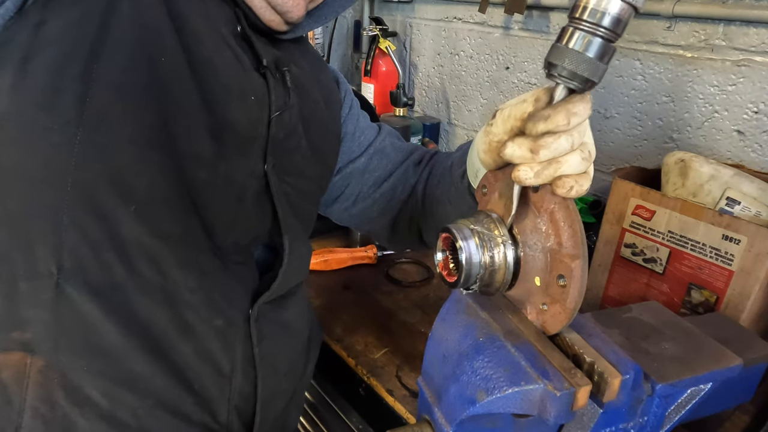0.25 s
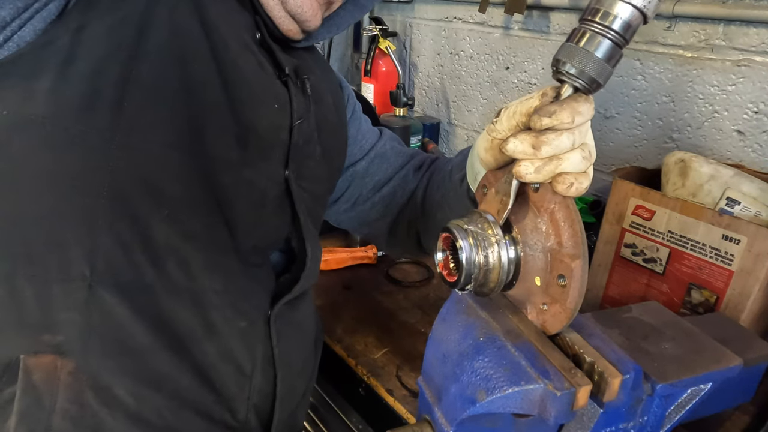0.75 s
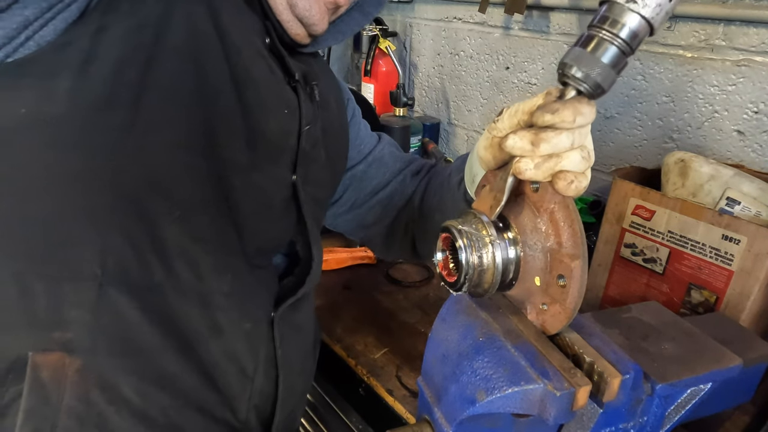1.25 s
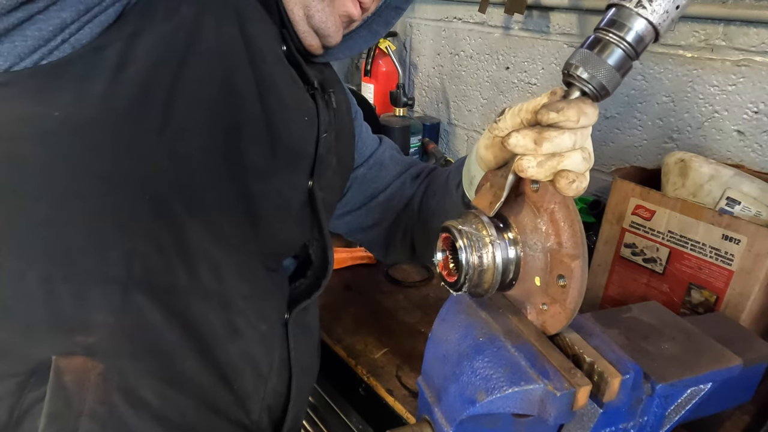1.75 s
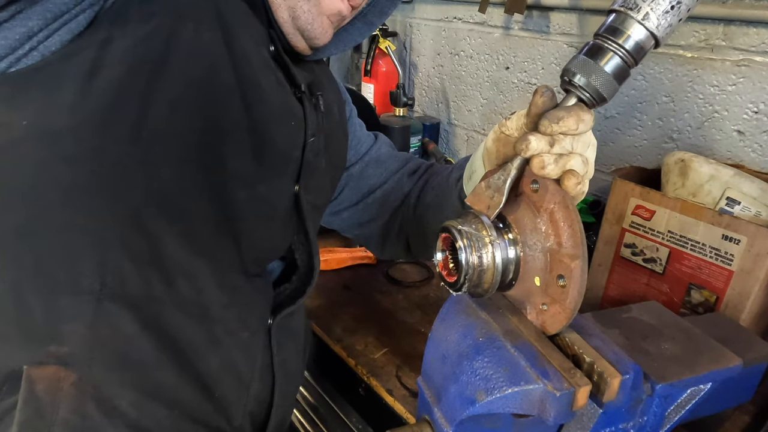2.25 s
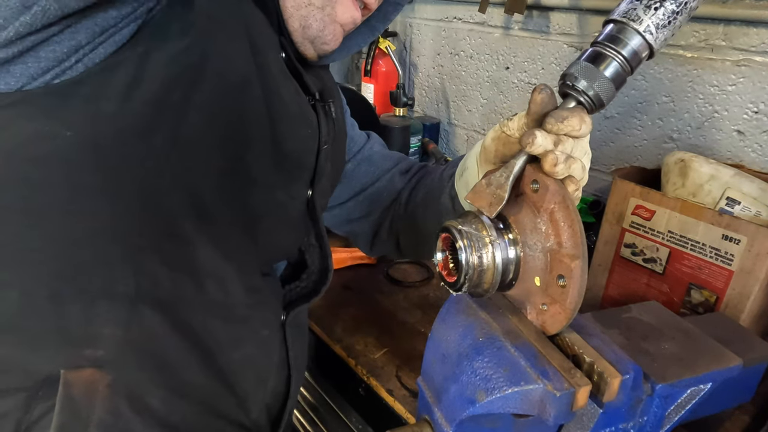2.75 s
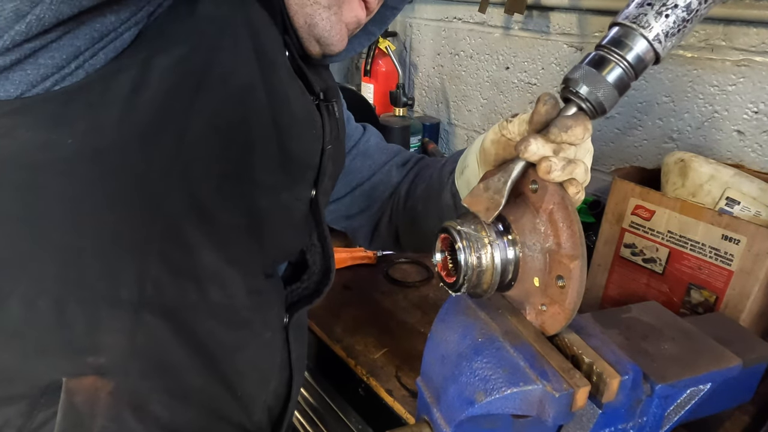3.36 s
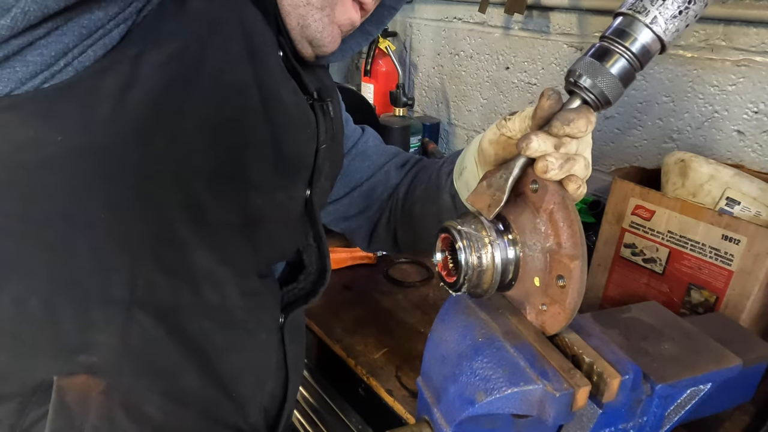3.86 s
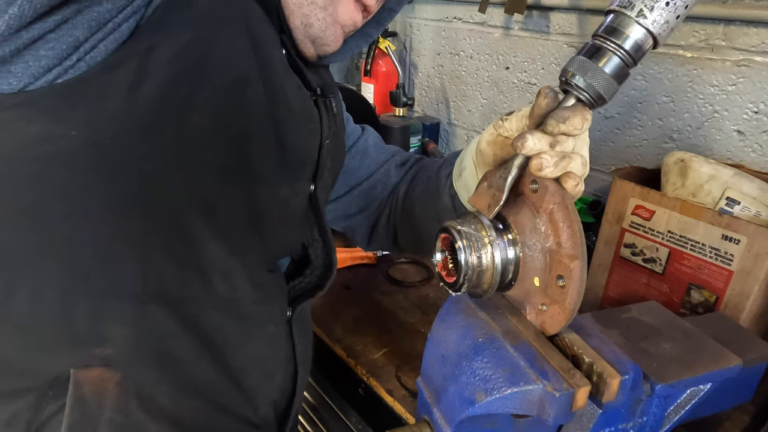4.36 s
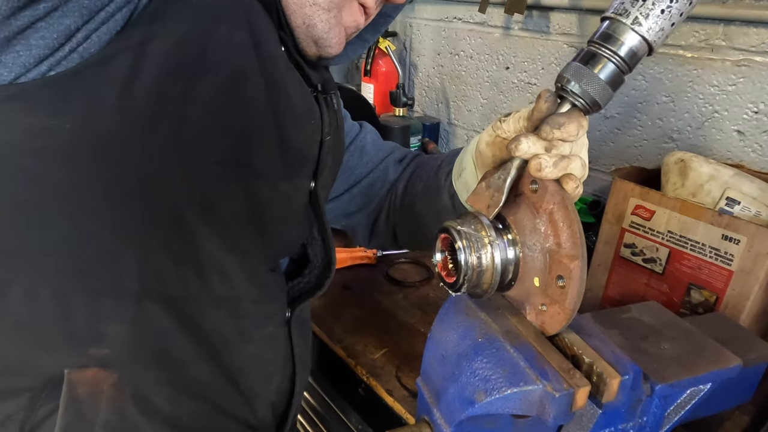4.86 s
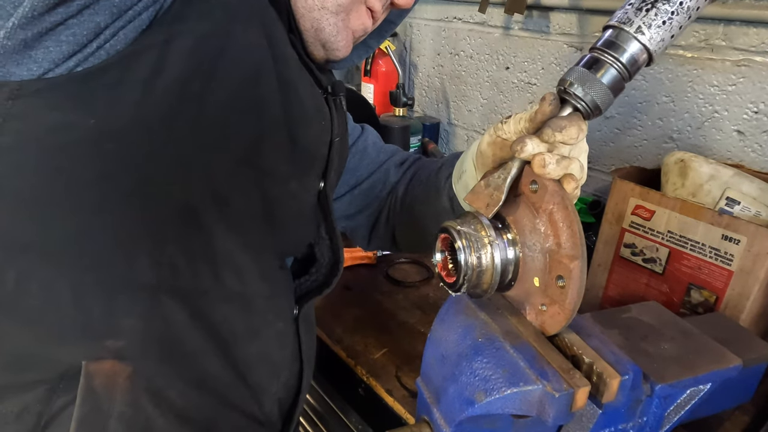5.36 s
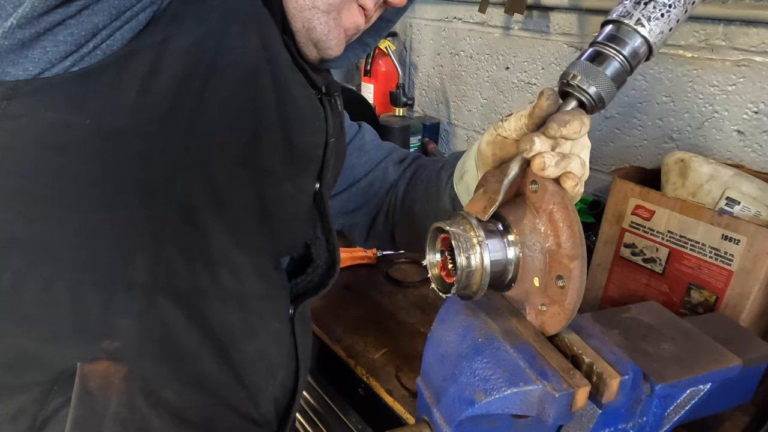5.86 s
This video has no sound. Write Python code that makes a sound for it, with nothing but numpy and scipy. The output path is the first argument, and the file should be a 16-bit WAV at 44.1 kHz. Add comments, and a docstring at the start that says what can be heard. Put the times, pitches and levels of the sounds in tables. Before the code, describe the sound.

Close, loud air-hammer work on a steel hub in a vise, in a hard workshop whose echo lasts over half a second. Air rushes at 0 s, and from 0.12 s strokes clatter at about 25 a second, each a blunt low-mid exhaust pop with a hard bright steel crack and a spit of air. From 0.5 to 0.95 s they slow to about 12 a second, with loose rattles, then race again until 1.8 s. A last clack at 1.9 s, and the ring fades into faint rubbing, tiny clicks, murmur and mains hum. Air bursts at 3.25 s; steady, brighter blows at about 18 a second run from 3.3 to 3.8 s, with stragglers to 4.1 s. A faint whistle rises and falls near 4 s, then climbs again from 4.6 s. Hammering resumes at 4.95 s, steady, then harder and faster from 5.5 s, stopping near 5.8 s with an echoing tail.

```python
"""Three bursts of hammering are heard: pops, bright steel cracks and dull knocks, with hissing air and a ringing room.
An air hammer chisels a steel hub held in a vise. Pressure humps make the pops; noise bursts ring steel and barrel.
Shaped noise makes the hiss, vent spits and rubbing; a gliding tone makes the valve's whistle.
A workshop echoes for over half a second above a low murmur and a mains hum.
Two microphone feeds, one dull and one full but a few ms later, are added together."""
import sys
import numpy as np
from scipy import signal
from scipy.fft import rfft, irfft, next_fast_len
from scipy.io import wavfile
from scipy.ndimage import uniform_filter1d

SR = 44100
rng = np.random.default_rng(int(sys.argv[2]) if len(sys.argv) > 2 else 0)


def store_wav(level_fs):
    """Save 16-bit WAV to argv[1]."""
    pcm = np.round(np.clip(np.atleast_2d(level_fs), -1, 1) * 32767)
    wavfile.write(sys.argv[1], SR, pcm.T.astype(np.int16))


N = 269451

# All levels in the tables are relative; the functions set the final loudness.
# Strokes of the piston. Each row: exhaust pop time in seconds, pop level in dB, delay of the steel blow in ms,
# blow level in dB, delay of the vent spit in ms, spit level in dB. Both delays count from the pop.
STROKES = [(0.121, -17.5, 4, -11.5, 6, -34), (0.177, -15, 1, -8, 5.5, -23),
           (.218, -11.5, 9.5, -6, 7.4, -21), (.253, -10, 5, -7.5, 13, -25), (0.291, -9.5, 4, -6, 6, -35),
           (.333, -9, 4, -6.5, 4, -30), (.375, -8.5, 4.5, -7, 9.5, -27), (.423, -13, 1, -9.5, 9, -24),
           (.457, -15.5, 6.5, -6, 12, -27.5), (.53, -23.5, 9.9, -10.5, 8, -26.5),
           (0.593, -22.5, 5.5, -13.5, 4, -29), (.666, -23, 2.5, -10.5, 5, -24.5),
           (.756, -20.5, 0.3, -12.5, 3, -25), (.854, -16.5, 0.9, -9.5, 4, -22.5),
           (.935, -16, 12, -7.5, 5, -22.5), (.994, -10, 6.5, -5.5, 10, -23), (1.031, -9.5, 3, -5, 8.5, -22),
           (1.061, -9, 0.8, -5.5, 9, -24.5), (1.088, -10.5, 2, -6.5, 6, -25),
           (1.115, -9, 2.4, -8.5, 7.5, -25), (1.143, -14, 3, -5.5, 9, -28.5),
           (1.195, -12.5, 2.4, -7, 6.5, -21), (1.229, -11.5, 3.5, -7.5, 6.5, -22.5),
           (1.264, -11.5, 5.5, -8, 5.5, -21), (1.3, -12.5, 5, -7.5, 9, -21),
           (1.337, -14.5, 6.5, -6.5, 10.5, -23.5), (1.373, -14.5, 7.5, -8, 14, -20.5),
           (1.413, -14.5, 7.5, -8, 12, -22), (1.455, -17.5, 7.5, -9, 10.5, -20.5),
           (1.495, -16.5, 11, -7, 13.5, -22), (1.541, -14.5, 8, -9.5, 12.9, -21),
           (1.585, -12, 6.5, -7, 12.5, -21), (1.627, -15, 6.5, -9.5, 11, -23.5),
           (1.67, -16, 6, -8, 11.5, -20.5), (1.716, -19, 7.5, -8, 13, -20),
           (1.776, -18, 13.5, -11, 15.5, -23.5), (3.303, -13, 6, -8, 7, -33),
           (3.355, -14.5, 5.7, -3.5, 9, -23), (3.406, -16, 7, -5, 8, -23),
           (3.456, -17.5, 8.5, -5.5, 6, -22), (3.512, -16, 8, -8, 4, -21.5),
           (3.569, -16, 8.5, -6, 6.5, -22.5), (3.627, -16.5, 8.5, -7.5, 6, -23),
           (3.686, -16, 6.5, -6, 5, -20.5), (3.744, -16.5, 8.5, -5, 10, -23),
           (3.809, -18.5, 10, -6, 3, -25), (3.911, -18, 1, -13.5, 1.5, -26),
           (4.077, -17.5, 1.5, -12.5, -.8, -27), (4.969, -11.5, -0.8, -9.5, 5, -19),
           (5.031, -15.5, .6, -8.5, 2.5, -22.5), (5.101, -17.5, -1, -8.5, 2, -22.5),
           (5.161, -18.5, -1.5, -9, 3.7, -25), (5.22, -18, -2.5, -6.5, 1, -21),
           (5.276, -18, -1.9, -9, 0.5, -18.5), (5.331, -18, -0.5, -6.5, 3, -22),
           (5.391, -18, 1.1, -9.5, 1.5, -25), (5.45, -16, -2, -8.5, -0.5, -23.5),
           (5.496, -13, 1.5, -9, -5, -19), (5.529, -8, 5.5, -3.5, 10.5, -21), (5.565, -5.5, 4, -8, 9, -28),
           (5.605, -8.5, 4.5, -6, 10, -22.5), (5.634, -9, 2, -4, 7, -20.5),
           (5.682, -10.5, 3, -8, 6.5, -22.5), (5.719, -12.5, 4, -9, 7, -23),
           (5.773, -22, 13, -9.5, 17.5, -23)]
# How the tool is held. Each row: start in seconds, time scale of the pop in ms, bench thud in dB, brightest ring in Hz,
# blow decay by 60 dB in seconds, tilt in dB per octave, shank ring in dB, rise time scale of the blow in ms,
# lift of the brightest ring in dB, spit decay by 60 dB in seconds, lead of the back knock before the pop in ms,
# knock level in dB, dull ring in dB, level of the rattle with it in dB. About -70 dB is in effect silent.
HOLDS = [(0, 4.06, -9, 2600, 0.037, -1.7, -0.5, 1.6, 4, 0.035, 13, -70, 1.5, -70.5),
         (.5, 5, -7.5, 6910, 0.024, -1, 0, 1.33, 7, 0.028, 15.6, -33.5, -1, -28),
         (.97, 3.57, -13.5, 2980, 0.03, -2, 0, 1.77, 2, 0.045, 26, -70, -1.5, -70),
         (1.4, 3.84, -12.5, 4700, 0.031, -1.4, .1, 1.46, 3.5, 0.042, 15, -72, 1, -70),
         (1.9, 4.8, -13.5, 2400, 0.023, 0, -0.5, 1.1, 7.5, 0.044, 15, -70, -4, -70),
         (3.2, 5, -3, 7200, 0.04, 2, 9, 2.1, 5, 0.069, 13, -27, -7.5, -74),
         (3.33, 5.6, -2.5, 7200, 0.02, 0.4, -0.5, 1.9, 7, 0.042, 21, -40, 7, -23),
         (3.43, 4.76, -2.5, 7150, 0.022, -0.7, 3.5, 2.2, 9.5, .048, 14.5, -33.5, -1, -24),
         (3.86, 3.36, -14, 4140, 0.027, -0.8, 14, 1.9, 5.5, 0.022, 17, -35.5, 0.7, -26),
         (4.8, 4.34, -5.5, 4130, 0.036, 0, 8, 2.5, 9, 0.033, 20.6, -25.5, -0.5, -33),
         (5, 3.76, -5.5, 4200, .027, -0.8, 9.5, 2.2, 7.5, 0.038, 14, -34, 2.5, -20),
         (5.47, 3.62, -9, 3900, 0.024, -3, -4, 1.75, 2.5, 0.046, 17, -72, 5, -70)]
HOLD_COLUMNS = ("start", "pop_ms", "thud_db", "ring_hz", "blow_t60", "tilt_db", "shank_db", "rise_ms",
                "lift_db", "spit_t60", "back_ms", "knock_db", "seat_db", "rattle_db")

# The bit bouncing or clicking by itself. Each row: time in seconds, level in dB, brightest ring in Hz,
# tilt in dB per octave.
RATTLES = [(0.205, -6, 3830, -1), (0.5326, -19, 3950, 5.5), (0.607, -11, 6960, 0),
           (0.6855, -14, 3700, -5.5), (0.87, -13.5, 2180, -2.5), (0.9409, -12.5, 3460, -3),
           (.976, -6.5, 3950, 0.5), (1.1757, -20, 2950, 0.5), (1.7773, -16, 2260, -6),
           (1.877, -29, 4200, -1), (1.925, -14.5, 4140, 0), (2.3494, -32.5, 2400, -10),
           (2.438, -40, 2410, -5), (2.5025, -45, 2380, -2), (2.5478, -44, 2360, -3),
           (2.976, -47.5, 1890, -7), (4.856, -13.5, 4230, -6), (4.8635, -22, 2370, -5),
           (4.8996, -18, 3740, -5.5), (4.979, -10, 1860, 0), (5.0836, -15, 2350, 3), (5.5177, -14, 4580, 8)]
# Rings of the struck steel. Each row: pitch in Hz, level in dB, decay by 60 dB in seconds.
STEEL = [(1900, -4, .05), (2393, 11, 0.019), (3090, 4, .04), (3714, 2.5, 0.081), (4210, 11, 0.022),
         (4734, 15.5, 0.013), (5800, 8, 0.049), (6910, 9.5, 0.017)]
# Tone colour of the crack. Each row: frequency in Hz, level in dB.
CRACK = [(500, -16.5), (1000, -5.5), (2000, 0.5), (4500, 4.5), (7000, 2), (7600, -2.5), (8900, -9.5),
         (9200, -27)]
RATTLE_LEAD_MS, RATTLE_HZ = 3, 4300  # rattle before each back knock, and its brightest ring

# Weak puffs of exhaust between strokes. Each row: time in seconds, level in dB.
PUFFS = [(0.239, -18.5), (.276, -26.5), (.314, -18.5), (0.356, -20), (.403, -25.5), (1.175, -23),
         (1.844, -32.5), (3.282, -20.5), (3.334, -25), (3.384, -26), (3.437, -29), (5.011, -24),
         (5.082, -17), (5.514, -16), (5.589, -23)]
PUFF_MS, PUFF_THUD_DB = 4.14, -1.5  # time scale, and bench thud over the puff
# Tone colour of the exhaust port. Each row: frequency in Hz, level in dB.
PORT = [(30, -46.5), (70, -17), (130, -3.5), (900, -1), (1600, -7)]
# Rings of the vise and bench. Each row: pitch in Hz, level in dB, decay by 60 dB in seconds.
BENCH = [(128.7, -6, 0.098), (178.2, -8.5, 0.051), (234.3, -14, 0.089), (302, -14.5, 0.05),
         (430, -9, 0.033), (555, -27, 0.036), (710, -16, 0.068), (942, -12, 0.077)]

# The bit shifting in its seat. Each row: time in seconds, level in dB, dull ring in dB.
KNOCKS = [(.16, -31.5, -1.5), (2.354, -53.5, 15), (2.5002, -46.5, -4), (2.9854, -64, 16.5),
          (3.9114, -59, 17), (4.0774, -49, 8), (4.8574, -45.5, 21.5)]
# Rings of the barrel. Each row: pitch in Hz, level in dB, decay by 60 dB in seconds.
BARREL = [(1362, -1.5, 0.024), (2337, -5.5, 0.038)]
# Rings of the bit's seat. Each row: pitch in Hz, level in dB, decay by 60 dB in seconds.
SEAT = [(452.6, 7, 0.05), (567, -1, 0.039), (863, -2, 0.033)]

# Spits of air from the vents between strokes. Each row: time in seconds, level in dB.
SPITS = [(.013, -21), (.102, -25), (0.2095, -22), (0.361, -27), (0.406, -31), (0.5446, -30), (.8909, -34),
         (.9802, -22), (1.1782, -35.5), (3.257, -15.5), (3.9455, -31), (4.8564, -29.5), (4.929, -36),
         (4.982, -24), (5.358, -28), (5.4824, -21), (5.5927, -34), (5.666, -28)]
# Treble rings in the spits. Each row: pitch in Hz, level in dB, decay by 60 dB in seconds.
STEEL_TOP = [(10110, 8, 0.0091), (11150, 8.5, 0.0113), (12470, 0.5, 0.011), (12000, -7.5, 0.022)]
# Tone colour of the spits. Each row: frequency in Hz, level in dB.
CRACK_TOP = [(8800, -59), (9300, 4), (10500, 15.5), (11700, 14), (12300, 8), (13200, 8), (14200, -52.5),
             (16400, -68)]
SPIT_RISE_S, KNOCK_SPIT_DB = 0.0013, -3.5  # rise time scale; spit over its back knock

# Air through the valve. Each row: time in seconds, hiss level in dB, level of its thin top in dB.
AIR = [(0, -28, -42.5), (.31, -28.5, -40), (.44, -39, -51.5), (.82, -34.5, -46), (1.29, -42, -54.5),
       (1.65, -38, -51), (1.86, -59, -64.5), (2.77, -70.5, -99), (3.2, -62.5, -79.5), (3.4, -33, -47),
       (3.72, -32.5, -47), (4.02, -43, -53), (4.14, -52.5, -58.5), (4.6, -51, -65), (4.93, -43.5, -59),
       (5.1, -30, -45), (5.55, -36.5, -45), (5.85, -36.5, -63)]
# The trigger is let go. Each row: start in seconds, end in seconds.
SHUT = [(1.831, 2.72), (5.83, 6.2)]
# Rushes of air as the trigger opens. Each row: start in seconds, length in seconds, hiss in dB, thin top in dB.
RUSHES = [(-.02, 0.13, -21, -35), (0.878, .055, -31, -45), (3.244, 0.071, -23, -35.5),
          (4.905, 0.0564, -28, -41.5), (5.464, .056, -22, -34)]
# Tone colour of the hiss at full flow. Each row: frequency in Hz, level in dB.
HISS = [(200, -29.5), (500, -13.5), (1400, -11), (1900, -1.5), (2350, 0.5), (2900, -5), (4200, 0),
        (5200, -3.5), (7200, -8.5), (7700, -36), (9000, -43)]
# Tone colour of a trickle of air. Each row: frequency in Hz, level in dB.
LEAK = [(200, -11), (550, -5.5), (850, -3), (1150, -11), (1400, -12.5), (1900, -14), (2280, 3),
        (2600, -13.5), (3700, -10.5), (5800, -23), (6600, -20), (7600, -31.5), (9000, -36.5)]
LEAK_DB = -41.5  # flow level at which trickle and full flow share equally
# Tone colour of the thin top. Each row: frequency in Hz, level in dB.
HISS_TOP = [(8900, -18), (9700, -10), (10300, 0.5), (10900, 1.5), (11400, 3), (12100, -7.5), (12900, -10),
            (13500, -12), (14200, -33), (16400, -47.5)]
# The half-open valve whistles. Each row: time in seconds, pitch in Hz, level in dB.
WHISTLE = [(3.95, 3550, -61), (4.0, 3700, -49), (4.045, 4250, -40), (4.09, 3910, -51), (4.13, 3534, -55.5),
           (4.6, 3665, -59.5), (4.72, 3740, -54.5), (4.79, 4080, -51), (4.84, 4290, -44)]

# Glove and bit rubbing on the work, air creeping in. Each row: start in seconds, length in seconds,
# centre in Hz, width in Hz, level in dB.
RUBS = [(2.294, 0.092, 2190, 1510, -58), (2.341, 0.35, 510, 302, -60.5), (2.418, 0.18, 3010, 2520, -76.5),
        (2.628, 0.44, 352, 302, -67.5), (2.702, 0.051, 1606, 200, -68), (2.803, 0.13, 1426, 302, -60.5),
        (2.946, 0.43, 1325, 250, -66), (3.002, 0.32, 2160, 398, -67.5), (3.077, 0.17, 4840, 700, -68)]

# Tone colour of the building's murmur. Each row: frequency in Hz, level in dB.
SHOP = [(25, -17.5), (60, -11.5), (130, -10), (250, -3.5), (500, -6), (1300, -13.5), (2400, -19.5),
        (5000, -25.5), (7000, -48.5), (12000, -52), (16000, -70)]
SHOP_DB = -68.5
# Mains hum and electric whine. Each row: pitch in Hz, level in dB.
HUM = [(120, -63.5), (241, -74.5), (360, -76.5), (500, -83), (1000, -85.5), (1500, -84), (2000, -78.5),
       (2500, -104), (3000, -85)]
# Echo of the workshop. Each row: frequency in Hz, decay by 60 dB in seconds.
ROOM = [(125, 0.75), (500, 0.7), (2000, 0.63), (5000, 0.67), (7500, 0.54), (12000, 0.35)]
ROOM_DB = -14

# Left-right difference. Each row: frequency in Hz, level against the middle in dB.
WIDTH = [(30, -20), (60, -22), (125, -37), (500, -33.5), (1000, -31.5), (2000, -33), (4000, -32.5),
         (8000, -21.5), (11000, -17.5), (16000, -4)]
# Tone colour of the microphones. Each row: frequency in Hz, level in dB.
MIC = [(8500, 0), (9050, 2.5), (9500, 1.5)]
FEED_LAG_S = 166.4 / SR  # the full feed comes this much later
DULL_FEED_HZ, DULL_FEED_DB = 8950, 3.5  # upper edge and level of the dull feed
LOW_CUT_HZ, TOP_HZ = 67, 16490
SPAN, LEAD = 8192, 512  # samples in one event, and those of them before its moment


def chisel():
    """The bit chatters on steel; the spot struck favours one ring, the angle sets brightness and shank ring."""
    s, db, hz, tilt_db = (c[:, None] for c in np.transpose(blows()))
    hold = held(s)
    hits = chatter(hold["rise_ms"] / 1000, hold["blow_t60"], CRACK, STEEL, -9)
    f = np.fft.rfftfreq(SPAN, 1 / SR) + 1
    favour = undb(hold["lift_db"] * np.exp(-((f - hz) / 400) ** 2))
    shank = undb(hold["shank_db"] * np.exp(-((f - 2350) / 220) ** 2))
    tilt = undb(tilt_db * np.log2(np.maximum(f, 900) / 3800))
    hits = irfft(rfft(hits) * favour * shank * tilt, SPAN)
    return place(s[:, 0], undb(db - 10.5) * hits)


def blows():
    """Rows (s, dB, brightest ring Hz, tilt dB per octave) of all steel contacts."""
    s, _, lag_ms, db, *_ = np.transpose(STROKES)
    hold = held(s)
    back, *_, rattle_db = back_knocks()
    strokes = zip(s + lag_ms / 1000, db, hold["ring_hz"], hold["tilt_db"])
    rattle_hz = np.full(len(s), RATTLE_HZ)
    back_rattles = zip(back - RATTLE_LEAD_MS / 1000, rattle_db, rattle_hz, hold["tilt_db"])
    return [*strokes, *RATTLES, *back_rattles]


def exhaust():
    """A quick dip, a pressure hump and a slow suck back, never twice alike; the shock thuds in vise and bench."""
    s, db, ms, thud_db = (c[:, None] for c in np.transpose(pops()))
    part = since() * 1000 / ms  # time in units of the pop's time scale
    lobes = ((.3, 0.078, -0.9), (.52, 0.096, 0.96), (.9, 0.25, -0.79), (1.4, 1, -0.13))  # (centre, width, size)
    sizes = undb(2.0 * rng.standard_normal((len(s), len(lobes))))
    pressure = 0
    for k, (centre, width, size) in enumerate(lobes):
        pressure = pressure + sizes[:, [k]] * size * np.exp(-((part - centre) / width) ** 2)
    pressure = pressure * (part > 0)
    rough = uniform_filter1d(rng.standard_normal(part.shape), size=24, axis=1)
    swirl = part * np.exp(-part / 0.82) * rough
    pop = unit(colour(pressure, PORT), peak=True) + undb(-6) * unit(colour(swirl, PORT), peak=True)
    thud = unit(ring(pop, BENCH, 3.6), peak=True)
    return place(s[:, 0] + .0008, undb(db - 7.0) * (pop + undb(thud_db) * thud))


def pops():
    """Rows (s, dB, time scale ms, thud dB) of all exhaust pops."""
    s, db, *_ = np.transpose(STROKES)
    hold = held(s)
    puffs = [(*puff, PUFF_MS, PUFF_THUD_DB) for puff in PUFFS]
    return [*zip(s, db, hold["pop_ms"], hold["thud_db"]), *puffs]


def piston():
    """A short soft contact rings the barrel and the duller seat of the bit."""
    back, back_db, back_seat_db, _ = back_knocks()
    knocks = [*KNOCKS, *zip(back, back_db, back_seat_db)]
    s, db, seat_db = (c[:, None] for c in np.transpose(knocks))
    t = since()
    push = (t > 0) * np.minimum(t / 0.0011, 1) * fade(t, 0.0061)
    force = push * rng.standard_normal((len(s), SPAN))
    barrel = unit(ring(force, BARREL, 2.0), peak=True)
    seat = unit(ring(force, SEAT, 2.0), peak=True)
    return place(s[:, 0], undb(db + 2.5) * (barrel + undb(seat_db) * seat))


def back_knocks():
    """Time, level, dull ring and rattle of the piston meeting the back of the barrel before each stroke."""
    s = np.array(STROKES)[:, 0]
    hold = held(s)
    return s - hold["back_ms"] / 1000, hold["knock_db"], hold["seat_db"], hold["rattle_db"]


def vents():
    """Short treble spits of air with each stroke and back knock, timed for the later feed that carries the treble."""
    s, *_, lag_ms, db = np.transpose(STROKES)
    back, knock_db, *_ = back_knocks()
    with_strokes = zip(s + lag_ms / 1000, db)
    with_knocks = zip(back, knock_db + KNOCK_SPIT_DB)
    s, db = np.transpose([*with_strokes, *SPITS, *with_knocks])
    spits = chatter(SPIT_RISE_S, held(s)["spit_t60"][:, None], CRACK_TOP, STEEL_TOP, -5)
    return place(s - FEED_LAG_S, undb(db - 1)[:, None] * spits)


def air():
    """Turbulent hiss in the tool's passages, a thin top from the vents and a whistle from the valve."""
    flow = air_flow()
    # a trickle only sounds the narrow passages; full flow roars broadly
    full = flow[0] ** 2 / (flow[0] ** 2 + undb(LEAK_DB) ** 2)
    roar = unit(colour(rng.standard_normal(N), HISS))
    trickle = unit(colour(rng.standard_normal(N), LEAK))
    blend = full * roar + (1 - full) * undb(1.4) * trickle
    hiss = flow[0] * undb(-7.5) * flicker(60, 2.6 * full) * blend
    thin = unit(colour(rng.standard_normal(N), HISS_TOP))
    top = flow[1] * undb(0.5) * flicker(90, 4.1 * full) * thin
    return hiss + top + whistle()


def air_flow():
    """Strength of the hiss and its thin top: shut with the trigger let go, rushing as it opens."""
    t, flow = np.arange(N) / SR, undb(curve(AIR))
    for start, end in SHUT:
        flow = flow * (1 - np.clip((t - start) / 0.079, 0, 1) * np.clip((end - t) / 0.077, 0, 1))
    for s, length, *db in RUSHES:
        opening = np.clip((t - s + 0.0018) / 0.025, 0, 1)
        closing = np.exp(-np.maximum(t - s - length, 0) / 0.004)
        flow = np.hypot(flow, undb(db)[:, None] * opening * closing)
    return flow


def whistle():
    """A tone glides with the valve; its steady part gives way to a noisy wobble as the pitch nears 4000 Hz."""
    first, last = WHISTLE[0], WHISTLE[-1]
    hz, db = curve([(first[0] - .05, first[1], -100), *WHISTLE, (last[0] + 0.031, last[1], -100)])
    breath = unit(uniform_filter1d(rng.standard_normal((2, N)), int(SR / 140), axis=1))
    turn = 2 * np.pi * np.cumsum(hz) / SR
    steady = np.clip((4000 - hz) / 300, 0, 1)
    return undb(db) * ((steady + breath[0] / 2) * np.cos(turn) + breath[1] / 2 * np.sin(turn))


def handling():
    """Rubbing makes soft grainy bands of noise that swell and fade."""
    t, f, out = np.arange(N) / SR, np.fft.rfftfreq(N, 1 / SR), 0
    for s, length, hz, width, db in RUBS:
        scrape = irfft(rfft(rng.standard_normal(N)) / (1 + (2 * (f - hz) / width) ** 2), N)
        swell = np.sin(np.pi * np.clip((t - s) / length, 0, 1)) ** 2
        out = out + undb(db - 3.0) * swell * flicker(77, 3.0) * unit(scrape)
    return out


def shop():
    """Low murmur of the building, mains hum and a faint electric whine: shaped noise and wavering tones."""
    t, hum = np.arange(N) / SR, 0
    for hz, db in HUM:
        hum = hum + undb(db) * flicker(16, 3.3) * np.sin(2 * np.pi * (hz * t + rng.random()))
    murmur = unit(colour(rng.standard_normal(N), SHOP))
    return undb(SHOP_DB) * flicker(1.5, 3.5) * murmur + hum


def walls(x):
    """Dense echoes that build over a few ms and die fastest in the high treble."""
    t, (hz, t60) = np.arange(SR) / SR, np.transpose(ROOM)
    noise, pitch = rfft(rng.standard_normal(SR)), np.log(np.fft.rfftfreq(SR, 1 / SR) + 1)
    tail = 0
    # overlapping bands that add up to the whole noise, each with its own decay
    for row, decay in zip(np.eye(len(hz)), t60):
        band = irfft(noise * np.interp(pitch, np.log(hz), row), SR)
        tail = tail + band * fade(t, decay)
    tail = tail * (1 - np.exp(-t / 0.0083))
    return undb(ROOM_DB) * signal.fftconvolve(x, tail / np.sqrt(np.sum(tail ** 2)))[:N]


def chatter(rise, t60, crack, modes, ring_db):
    """Spiky noise swells and fades within a few ms and sets the modes ringing; rows of peak 1."""
    spikes = np.repeat(undb(4.22 * rng.standard_normal((len(t60), SPAN // 32))), 32, axis=1)
    t = np.maximum((np.arange(SPAN) - LEAD) / SR + 0.37 * rise, 0)
    swell = (1 - np.exp(-t / rise)) ** 3 * fade(t, t60)
    force = swell * spikes * rng.standard_normal(spikes.shape)
    rings = ring(force, modes, 3)
    return unit(unit(colour(force, crack)) + undb(ring_db) * unit(colour(rings, crack)), peak=True)


def ring(force, modes, scatter_db):
    """Each row of force rings the modes, caught differently every time."""
    t, (hz, db, t60) = np.arange(SPAN) / SR, np.transpose(modes)
    tones = np.sin(2 * np.pi * hz[:, None] * t) * fade(t, t60[:, None])
    gains = undb(db + scatter_db * rng.standard_normal((len(force), len(hz))))
    return irfft(rfft(force) * rfft(gains @ tones), SPAN)


def held(s):
    """Named columns of HOLDS in force at times s, each shaped like s."""
    rows = np.array(HOLDS)
    current = rows[np.searchsorted(rows[:, 0], s, side="right") - 1]
    return dict(zip(HOLD_COLUMNS, np.moveaxis(current, -1, 0)))


def since():
    """Seconds since the moment of an event, 0 before it."""
    return np.maximum(np.arange(SPAN) - LEAD, 0) / SR


def place(times, rows):
    """Rows laid on the time line; each begins LEAD samples before its moment."""
    out = np.zeros(N + SPAN + LEAD)
    for s, row in zip(times, rows):
        start = int(s * SR)
        out[start:start + SPAN] += row * signal.windows.tukey(SPAN, LEAD / SPAN)
    return out[LEAD:LEAD + N]


def curve(table):
    """Columns of a table joined by straight lines, one value a sample."""
    s, *columns = np.transpose(table)
    return [np.interp(np.arange(N) / SR, s, c) for c in columns]


def flicker(rate, depth_db):
    """Gain that wanders about rate times a second."""
    k = int(SR / rate)
    steps = np.repeat(rng.standard_normal(N // k + 1), k)
    return undb(depth_db * uniform_filter1d(steps, k)[:N])


def colour(x, table):
    """Filter the last axis by (Hz, dB) points."""
    n, (hz, db) = x.shape[-1], np.transpose(table)
    pitch = np.log(np.fft.rfftfreq(n, 1 / SR) + 1)
    return irfft(rfft(x) * undb(np.interp(pitch, np.log(hz), db)), n)


def unit(x, peak=False):
    """Rows scaled to an rms (average strength) of 1, or to a peak of 1."""
    size = np.abs(x).max(-1, keepdims=True) if peak else np.sqrt(np.mean(x ** 2, -1, keepdims=True))
    return x / size


def fade(t, t60):
    """Decay by 60 dB in t60 seconds."""
    return np.exp(-np.log(1000) * t / t60)


def undb(db):
    """dB to gain."""
    return 10 ** (np.asarray(db) / 20)


def scene():
    """The tool in its room; left and right differ unsteadily, most of all in the high treble."""
    tool = chisel() + exhaust() + piston() + vents() + air() + handling()
    mid = tool + walls(tool) + shop()
    sway = unit(uniform_filter1d(rng.standard_normal(N), int(SR / 150)))
    side = colour(mid * sway, WIDTH)
    return np.array([mid + side, mid - side])


def record(dry):
    """A dull feed and a full one that lags it are summed, which combs all below the dull feed's edge."""
    size = next_fast_len(N + SR)
    hz = np.fft.rfftfreq(size, 1 / SR)
    dull = undb(DULL_FEED_DB) / (1 + (hz / DULL_FEED_HZ) ** 60)
    late = np.exp(-2j * np.pi * hz * FEED_LAG_S)
    padded = np.pad(dry, ((0, 0), (LEAD, 0)), "reflect")
    mix = irfft(rfft(padded, size) * (dull + late), size)[:, LEAD:LEAD + N]
    low_cut = signal.butter(2, LOW_CUT_HZ, "high", fs=SR, output="sos")
    top_cut = signal.ellip(14, .2, 90, TOP_HZ, fs=SR, output="sos")
    return signal.sosfilt(top_cut, signal.sosfilt(low_cut, colour(mix, MIC)))


dry = scene()
out = record(dry)
store_wav(out)
```